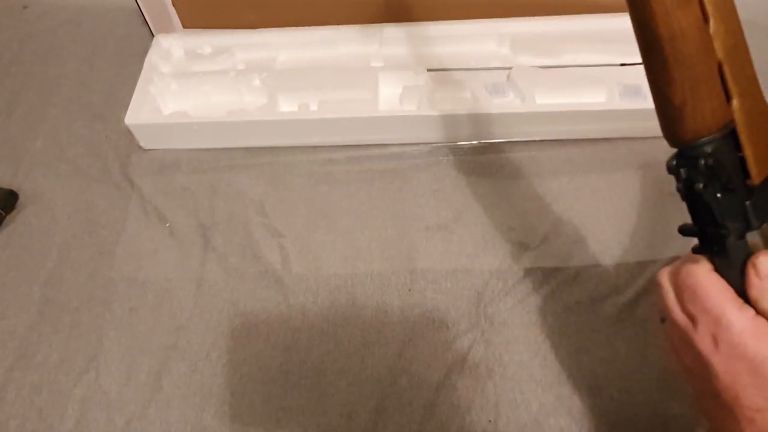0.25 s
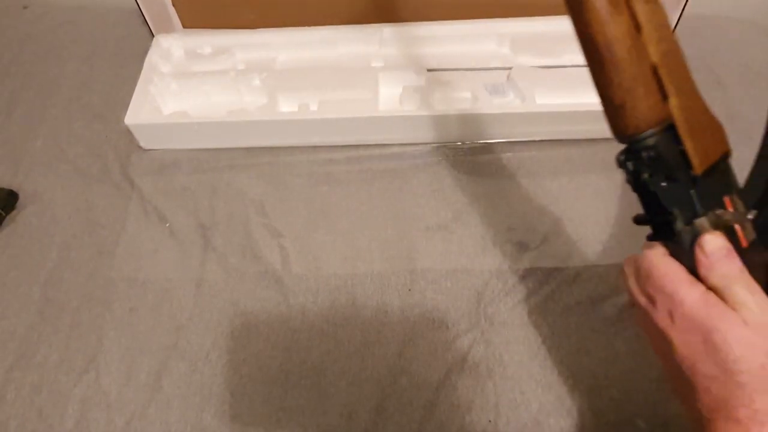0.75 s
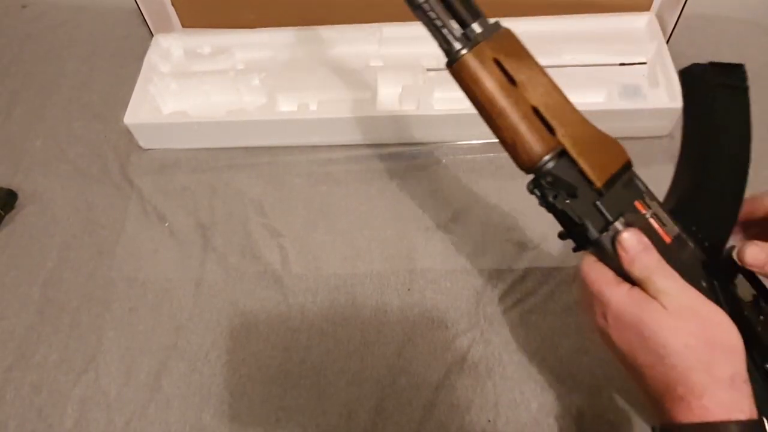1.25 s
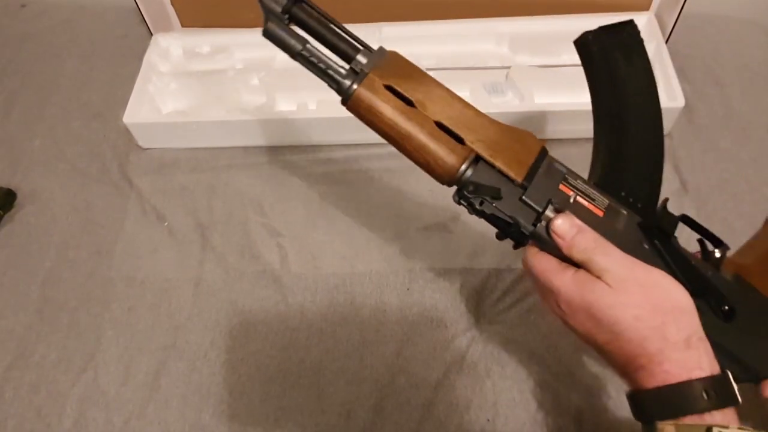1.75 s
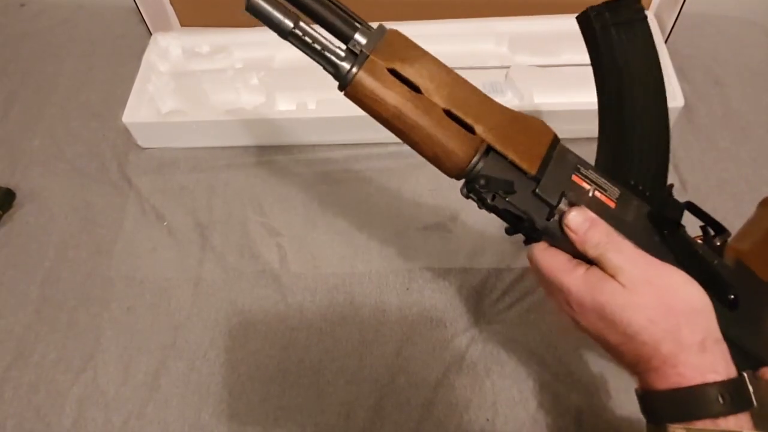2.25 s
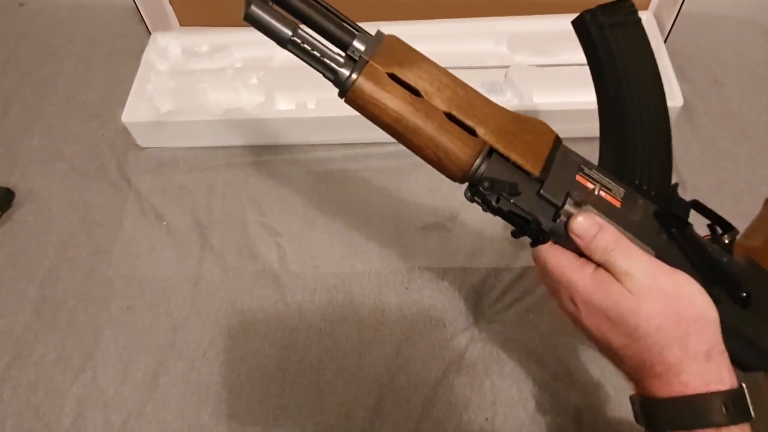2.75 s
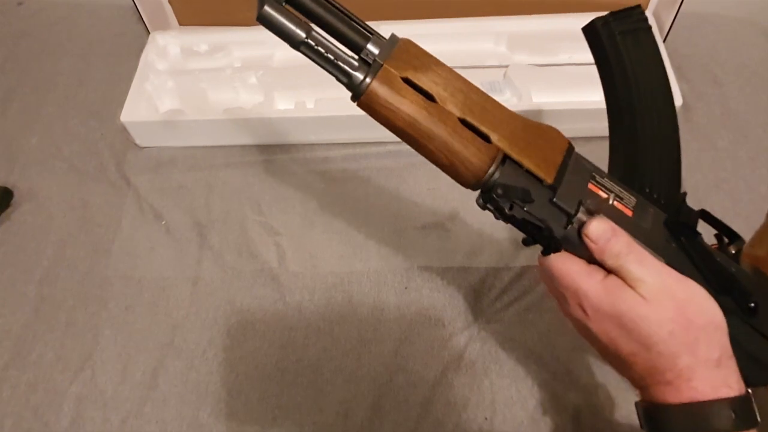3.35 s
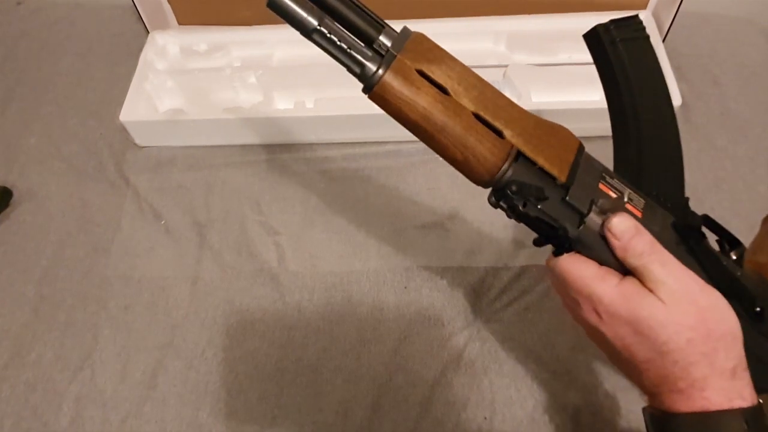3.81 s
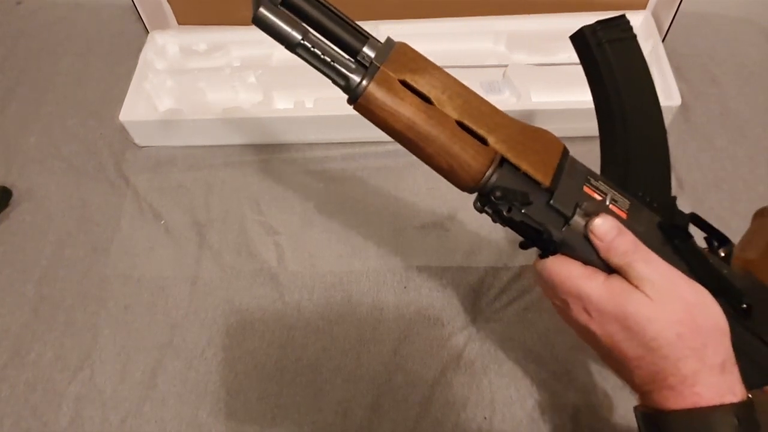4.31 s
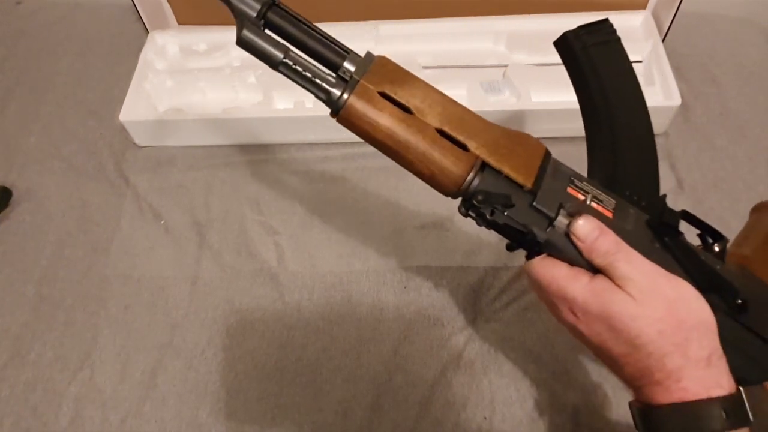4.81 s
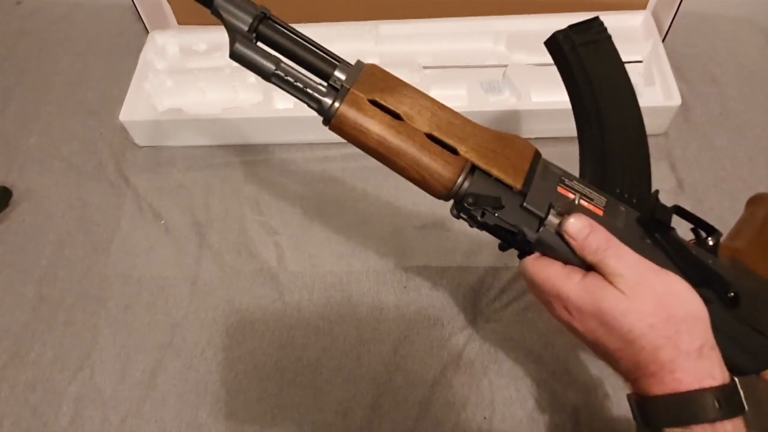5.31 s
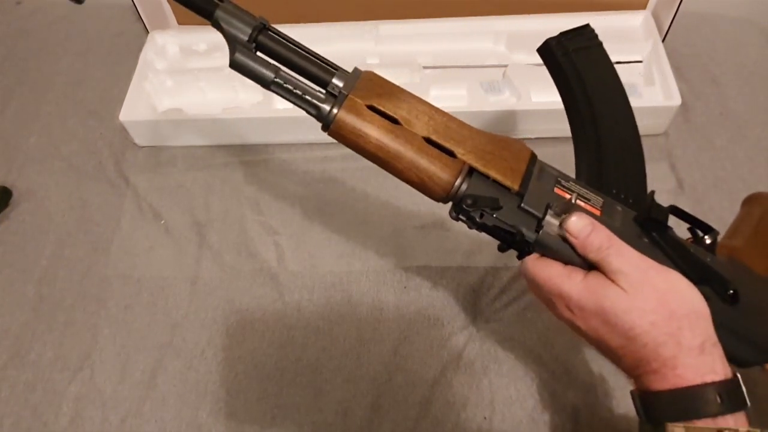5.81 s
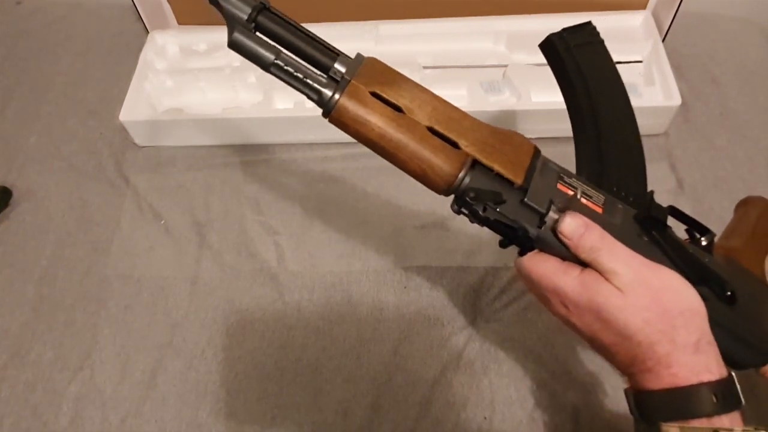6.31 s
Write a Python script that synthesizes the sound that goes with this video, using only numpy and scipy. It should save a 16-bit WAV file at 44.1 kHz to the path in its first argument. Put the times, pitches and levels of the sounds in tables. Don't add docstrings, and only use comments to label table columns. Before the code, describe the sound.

Hands turn a plastic and metal toy rifle in a small soft room, with faint knocks, ticks and rubbing before loud, sharp latch clicks near the end.

```python
import sys
import numpy as np
from scipy import signal
from scipy.fft import rfft, irfft
from scipy.io import wavfile
from scipy.ndimage import uniform_filter1d

SR = 44100
rng = np.random.default_rng(int(sys.argv[2]) if len(sys.argv) > 2 else 0)


def inscribe(sig):
    pcm = np.round(np.clip(np.atleast_2d(sig).T, -1, 1) * 32767)
    wavfile.write(sys.argv[1], SR, pcm.astype(np.int16))


def ratio_of_db(decibels):
    return 10 ** (np.asarray(decibels, float) / 20)


N = 289296

# pitch in Hz, width in Hz, level in dB.
STOCK = [(521, 38, 1), (720.4, 130, -2.5), (350, 55, -7.5), (196, 150, -15)]
# pitch in Hz, width in Hz, level in dB.
SHELL = [(1020, 79, -5.5), (1320, 180, 0), (1517, 300, 4.5), (1973, 580, 1), (2617, 550, -3.5),
         (3180, 120, -3)]
# pitch in Hz, width in Hz, level in dB.
CLICK = [(4160, 390, -6), (4220, 3000, 6), (5684, 540, 17), (5900, 5100, -3)]
# pitch in Hz, width in Hz, level in dB.
STEEL = [(8800, 2900, 5), (9400, 2400, 5), (11030, 1500, -9), (13300, 4500, 2)]
# pitch in Hz, gain in dB.
PORT_LEFT = [(100, -17), (400, -1), (3500, -0.5), (4500, -1), (5500, -2), (6500, -6), (7400, -20),
             (8600, -8), (10000, -16.5), (11500, -24), (14000, -36.5), (17000, -61)]
# pitch in Hz, gain in dB.
PORT_RIGHT = [(100, -9.5), (400, -1.5), (2500, 1), (3700, -10.5), (5500, -9), (6500, -7.5), (7400, -30.5),
              (8800, -43.5), (10000, -33), (11200, -18), (14000, -37), (17000, -54)]


def contacts():
    # start in seconds, peak of the click in dB,
    # then stock, shell and steel in dB relative to the click.
    blows = [(0.0004, -57, 9, 10, -39), (0.0208, -40, -6, 1, -49), (0.216, -58.5, -8, -18, 10),
             (0.6817, -58, -5, 5.5, -25), (0.7025, -60.5, 5.5, 18.5, 1), (0.9274, -48, -13, -25, 4.5),
             (1.0295, -44, -17, -3.5, -4), (2.211, -52, -9, -6.5, -3), (2.3099, -40, -19.5, -16, -14),
             (2.9019, -36, -12.5, -8, -10.5), (2.935, -46, -7.5, -25, -24), (2.9619, -19.5, -28, -12, -6),
             (3.2126, -42.5, -97, -1.5, -64), (3.967, -49, -1.5, 4.5, -43), (3.976, -53.5, 2, -27, -32),
             (4.1065, -34, -17, -15.5, -8), (4.2351, -43, -17.5, -6.5, -27),
             (4.2542, -37.5, -18, -27, -3.5), (4.9692, -38, -9.5, -9, -44.5),
             (5.3282, -9, -19.5, -12.5, -14), (5.6214, -15.5, -16, -12.5, -12.5),
             (5.6311, -37, -9.5, 5.5, -23.5), (5.7287, -4, -25.5, -14, -12.5),
             (5.753, -18.5, -23.5, -6.5, -6.5)]
    # start in seconds, peak in dB, shell in dB relative to it.
    ticks = [(0.3009, -48.5, -26), (1.1074, -50, -16), (1.3795, -50, -14), (2.0804, -50.5, -11.5),
             (2.1021, -50, -19), (2.677, -55, -5), (2.6957, -51.5, -12), (2.7452, -56, -5.5),
             (2.9113, -37.5, -28), (3.0462, -42.5, -11), (3.0532, -58, 5), (3.0643, -48, -18),
             (3.1224, -48.5, -13), (3.134, -49.5, -8.5), (3.1778, -47, -16), (3.193, -54, -9),
             (3.9283, -64.5, 1.5), (4.2579, -35.5, -6), (6.417, -52.5, -11), (6.445, -54.5, -19),
             (6.465, -51.5, -5), (6.4795, -53.5, -6.5), (6.5, -52.5, -9.5)]
    # start in seconds, peak in dB, stock in dB relative to it.
    pats = [(0.356, -51.5, -15), (0.3839, -57, -5), (0.7637, -53, -0.5), (1.138, -57, 0),
            (2.2594, -52.5, -7), (2.3281, -69, 5.5), (2.892, -50.5, -5.5), (3.3494, -74, 4.5),
            (6.021, -66.5, -10), (6.0392, -64.5, -4), (6.0913, -67.5, -6)]
    blow_ms, tick_ms, pat_ms = 1.46, 0.93, 1.5
    tick_stock_db, tick_steel_db = -23, -9.5
    pat_shell_db, pat_steel_db = -35, -11
    events = [(*row, blow_ms) for row in blows]
    for start, db, shell_db in ticks:
        events.append((start, db, tick_stock_db, shell_db, tick_steel_db, tick_ms))
    for start, db, stock_db in pats:
        events.append((start, db, stock_db, pat_shell_db, pat_steel_db, pat_ms))
    return events


def crack(contact_ms, size):
    t = np.arange(size) / SR
    envelope = (1 - np.exp(-t / 0.00097)) * np.exp(-t / (contact_ms / 1000))
    burst = rfft(rng.standard_normal(size) * envelope)
    smooth_power = uniform_filter1d(np.abs(burst) ** 2, size=25)
    even = irfft(burst / np.sqrt(smooth_power))
    return rfft(even * (t < 0.02))


def knocks():
    # pitch in Hz, width in Hz, level in dB.
    barrel = [(1996, 9.3, 4.5), (1212, 12, -4.5), (5320, 18, 1)]
    size = 4096
    out, ports = np.zeros(N + size), heard(size)
    for start, db, stock_db, shell_db, steel_db, contact_ms in contacts():
        burst = crack(contact_ms, size)
        parts = (  # modes, what drives them, level in dB, trim in dB
            (CLICK, burst, 0, 0.23),
            (STOCK, 1, stock_db, 11.5),
            (SHELL, burst, shell_db, 7.5),
            (STEEL, burst, steel_db, 5.0))
        for modes, drive, part_db, trim_db in parts:
            chance = ratio_of_db(2.2 * rng.standard_normal(len(modes)))
            part = drive * ring(modes, size, chance)
            peak = np.max(np.abs(irfft(part * ports)))
            i = int(start * SR)
            out[i:i + size] += irfft(part) * ratio_of_db(db + part_db + trim_db) / peak
    singing = irfft(rfft(out) * ring(barrel, len(out)), len(out))
    return (out + singing)[:N]


def ring(modes, size, weight=1):
    hz = np.fft.rfftfreq(size, 1 / SR)[:, None] + 1
    f, width, db = np.transpose(modes)
    resonance = 1j * hz * width / (f ** 2 - hz ** 2 + 1j * hz * width)
    return np.sum(weight * ratio_of_db(db) * resonance, axis=1)


def colour(points, size):
    hz = np.fft.rfftfreq(size, 1 / SR) + 1
    f, db = np.transpose(points)
    gain = ratio_of_db(np.interp(np.log(hz), np.log(f), db))
    cepstrum = irfft(np.log(gain), size)
    cepstrum[1:size // 2] *= 2
    cepstrum[size // 2 + 1:] = 0
    return np.exp(rfft(cepstrum))


def heard(size):
    return (colour(PORT_LEFT, size) + colour(PORT_RIGHT, size)) / 2


def stroke(start, length):
    attack_s, release_s = 0.037, 0.083
    t = np.arange(N) / SR - start
    swell = np.clip(t / attack_s + 0.25, 0, 1) ** 2
    let_go = np.exp(-np.clip(t - length, 0, None) / release_s * 2)
    return swell * let_go


def rubbing(gains, parts, slips_hz, scatter_db, trim_db):
    out, ports = 0, heard(N)
    slips = (rng.random(N) < slips_hz / SR) * rng.standard_normal(N)
    slips *= ratio_of_db(scatter_db * rng.exponential(size=N))
    for gain, modes in zip(gains, parts):
        part = rfft(slips) * ring(modes, N)
        rms = np.std(irfft(part * ports, N))
        out = out + irfft(part, N) / rms * gain * ratio_of_db(trim_db)
    return out


def sliding():
    # start in seconds, length in seconds, level in dB.
    slides = [
        (0.0, 0.089, -73),
        (0.845, 0.31, -66.5),
        (1.265, 0.28, -65),
        (1.555, 0.11, -66.5),
        (1.73, 0.315, -57.5),
        (2.707, 0.41, -69),
        (6.345, 0.3, -79),
    ]
    glide = sum(ratio_of_db(db) * stroke(start, length) for start, length, db in slides)
    gains = (glide, glide * ratio_of_db(-9))
    return rubbing(gains, (CLICK, STEEL), slips_hz=2600, scatter_db=4.0, trim_db=-8.5)


def creaking():
    # start in seconds, length in seconds, level in dB, stock in dB relative to the shell.
    creaks = [
        (0.0, 0.14, -70, -7),
        (0.4, 0.16, -100.5, 32.5),
        (0.819, 0.37, -79, 9.5),
        (1.33, 0.36, -71.5, -7),
        (2.16, 0.28, -76, 0),
        (2.61, 0.09, -71.5, -9),
        (2.748, 0.22, -83, 8.7),
        (6.041, 0.086, -93.5, 2.5),
        (6.279, 0.11, -75, -12),
        (6.424, 0.2, -82.5, -18),
    ]
    shell = sum(ratio_of_db(db) * stroke(start, length) for start, length, db, _ in creaks)
    stock = sum(ratio_of_db(db + stock_db) * stroke(start, length) for start, length, db, stock_db in creaks)
    return rubbing((stock, shell), (STOCK, SHELL), slips_hz=1300, scatter_db=3.2, trim_db=-1.5)


def palm_rubs():
    # pitch in Hz, width in Hz, level in dB.
    palm = [(313, 210, 26), (400, 360, -40)]
    # start in seconds, length in seconds, level in dB.
    rubs = [
        (1.565, 0.42, -73),
        (3.03, 0.6, -94),
    ]
    pressure = sum(ratio_of_db(db) * stroke(start, length) for start, length, db in rubs)
    return rubbing((pressure,), (palm,), slips_hz=258, scatter_db=2.0, trim_db=1.5)


def room(x):
    # delay in seconds, left level in dB, right level in dB.
    echoes = [(.0035, -7.5, -15), (.0078, -2.5, -6), (.012, -11, -12)]
    low_t60_s, high_t60_s = 0.23, 0.2
    tail_db, direct_right_db = 3.5, -3
    t, out = np.arange(SR // 2) / SR, []
    shared = rng.standard_normal(len(t))
    bass = signal.butter(2, 600, fs=SR, output="sos")
    for c, port in enumerate((PORT_LEFT, PORT_RIGHT)):
        noise = rng.standard_normal(len(t))
        noise += signal.sosfiltfilt(bass, shared - noise)
        low = signal.lfilter([0.2], [1, -0.8], noise)
        tail = low * ratio_of_db(-60 * t / low_t60_s) + (noise - low) * ratio_of_db(-60 * t / high_t60_s)
        tail *= 1 - np.exp(-t / 0.001)
        tail *= ratio_of_db(tail_db) / np.sqrt(np.sum(tail ** 2))
        tail[0] += ratio_of_db(c * direct_right_db)
        for late, *db in echoes:
            tail[int((late + 0.0004 * c) * SR)] += ratio_of_db(db[c])
        wet = signal.fftconvolve(x, tail)[:N]
        out.append(irfft(rfft(wet) * colour(port, N), N))
    return np.array(out)


def hush():
    # pitch in Hz, level in dB per Hz.
    hush_left = [(24, -112), (48, -102), (240, -104), (450, -112), (1000, -115), (3800, -116), (4500, -102),
                 (5600, -97), (6300, -101), (7400, -124), (8800, -107), (10200, -121), (11600, -126),
                 (12600, -140)]
    # pitch in Hz, level in dB per Hz.
    hush_right = [(24, -109), (48, -99), (240, -102), (450, -109), (1000, -116), (3700, -121), (4500, -113),
                  (5600, -113), (6300, -118), (7400, -129), (8800, -131), (10200, -126), (11600, -125),
                  (12600, -140)]
    # pitch in Hz, rms level in dB.
    hum_tones = [(59.5, -87), (99, -86), (198, -87)]
    # time in seconds, gain in dB.
    phone_gain = [(0, 4), (2.2, 2), (3.4, 3), (5.3, 1.5), (5.75, 1.5), (6.56, -4)]
    t, hz = np.arange(N) / SR, np.fft.rfftfreq(N, 1 / SR)
    wander_db = np.interp(t, np.arange(40) / 6, rng.standard_normal(40))
    noise = rng.standard_normal((3, N))
    noise[0] *= ratio_of_db(wander_db - 1.5)
    both, left, right = rfft(noise) * np.sqrt(SR / 2)
    alike = 0.8 / (1 + (hz / 400) ** 2)
    out = []
    for own, points in ((left, hush_left), (right, hush_right)):
        mixed = np.sqrt(alike) * both + np.sqrt(1 - alike) * own
        out.append(irfft(mixed * colour(points, N), N))
    hum = sum(np.sqrt(2) * ratio_of_db(db) * np.sin(2 * np.pi * f * t) for f, db in hum_tones)
    gain_s, gain_db = np.transpose(phone_gain)
    return (np.array(out) + hum) * ratio_of_db(np.interp(t, gain_s, gain_db))


def scene():
    toy = knocks() + sliding() + creaking() + palm_rubs()
    return room(toy) + hush()


def roll_off(x):
    return signal.sosfilt(signal.butter(12, 16520, fs=SR, output="sos"), x)


def record(dry):
    limit, top_hz = 0.97, 15650
    rounded = limit * np.tanh(dry / limit)
    low_pass = signal.ellip(8, 0.3, 50, top_hz, fs=SR, output="sos")
    return roll_off(signal.sosfilt(low_pass, rounded))


dry = scene()
out = record(dry)
inscribe(out)
```